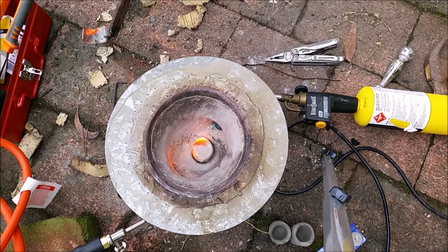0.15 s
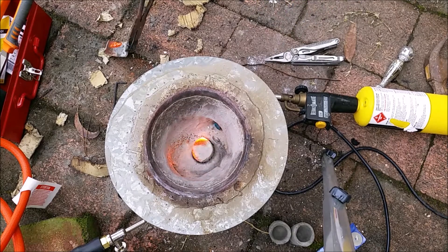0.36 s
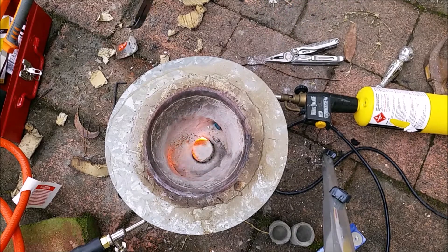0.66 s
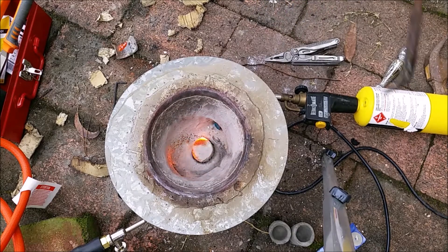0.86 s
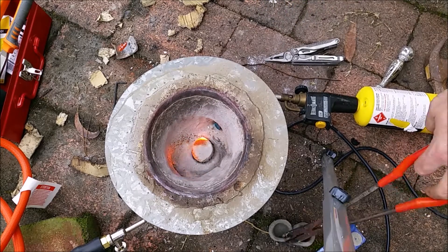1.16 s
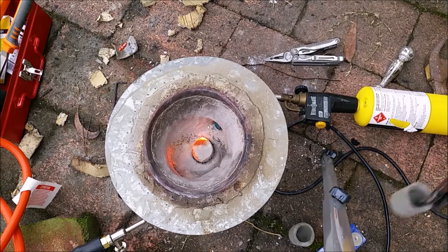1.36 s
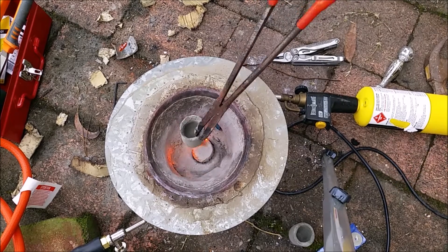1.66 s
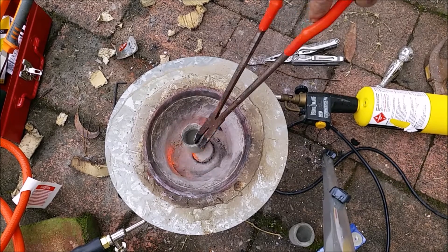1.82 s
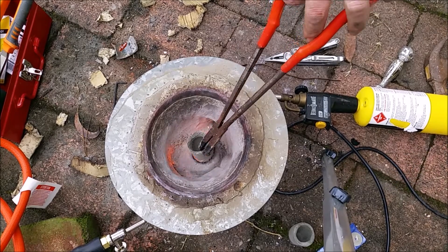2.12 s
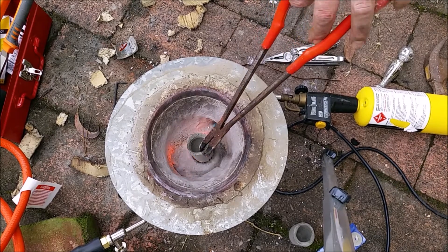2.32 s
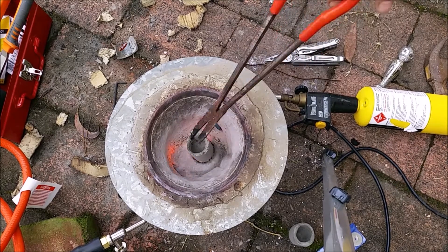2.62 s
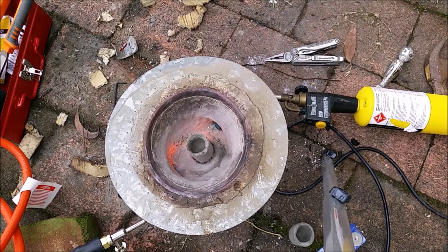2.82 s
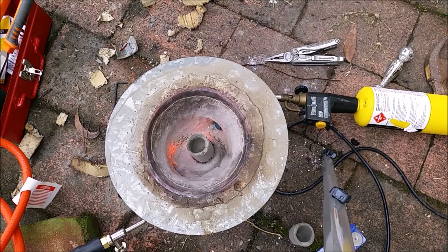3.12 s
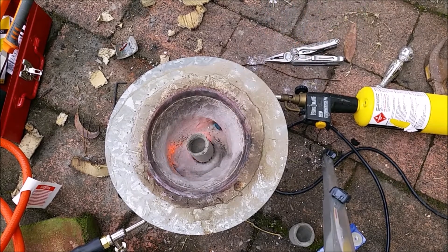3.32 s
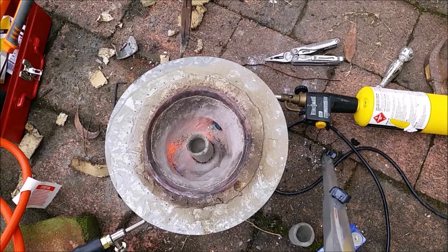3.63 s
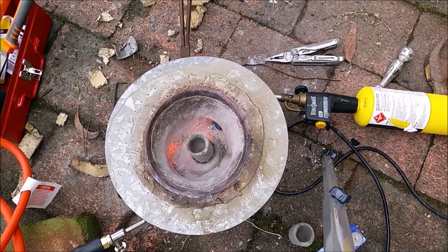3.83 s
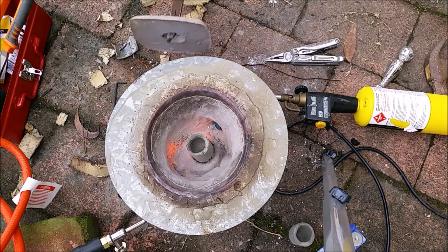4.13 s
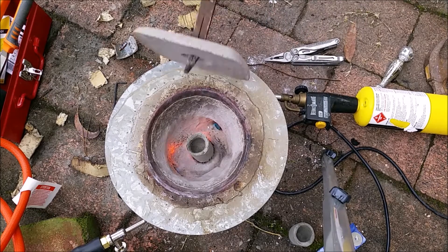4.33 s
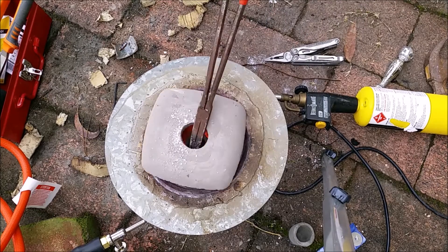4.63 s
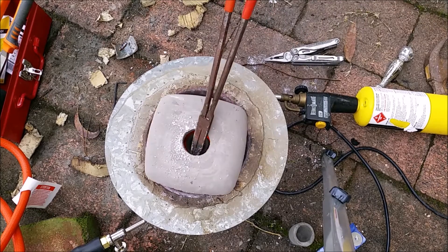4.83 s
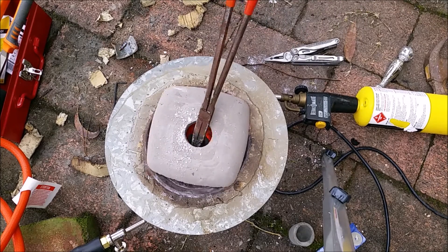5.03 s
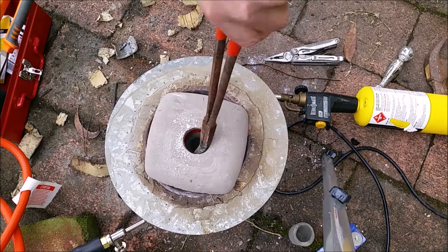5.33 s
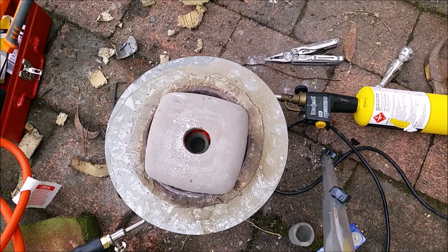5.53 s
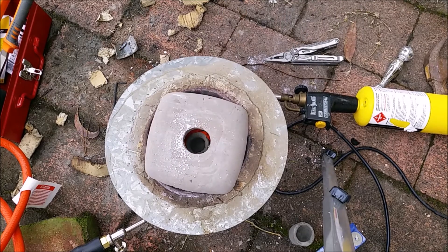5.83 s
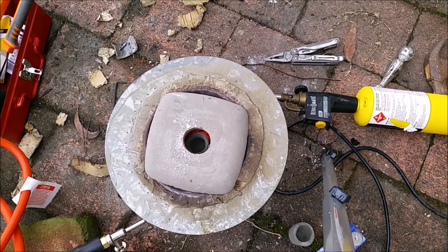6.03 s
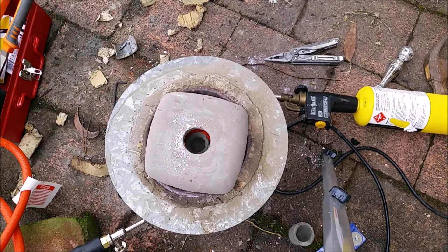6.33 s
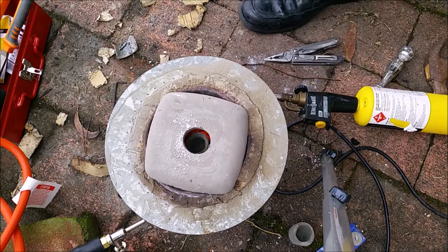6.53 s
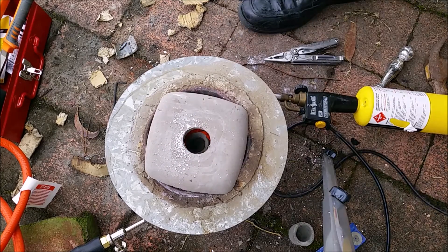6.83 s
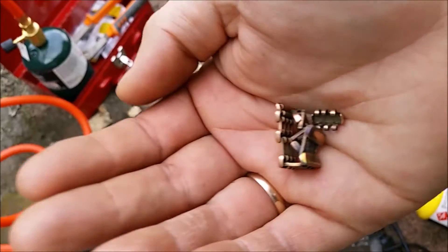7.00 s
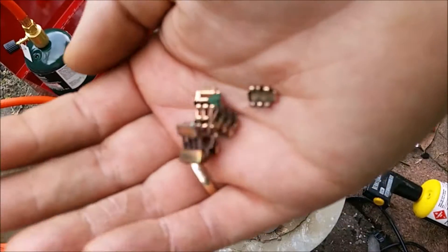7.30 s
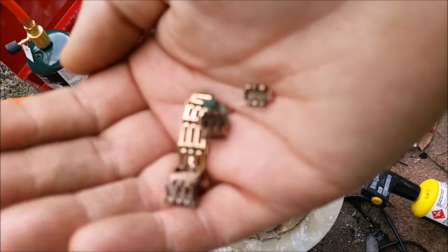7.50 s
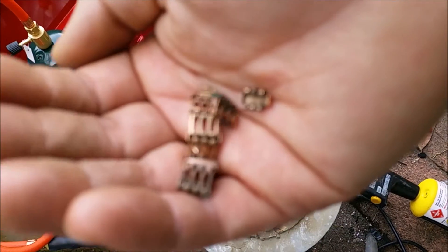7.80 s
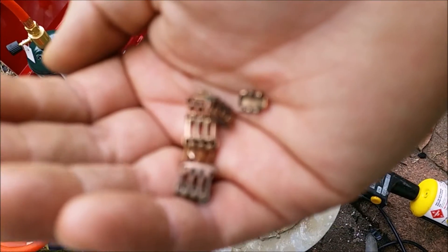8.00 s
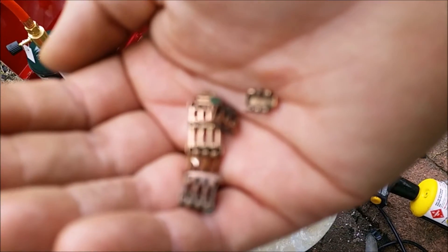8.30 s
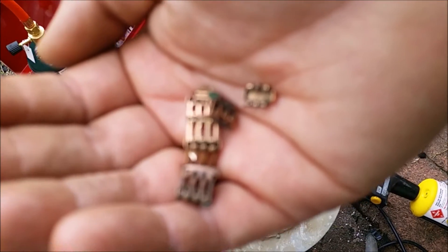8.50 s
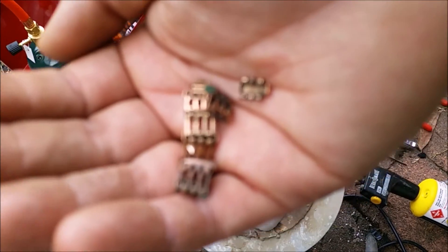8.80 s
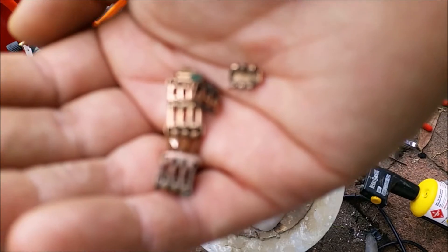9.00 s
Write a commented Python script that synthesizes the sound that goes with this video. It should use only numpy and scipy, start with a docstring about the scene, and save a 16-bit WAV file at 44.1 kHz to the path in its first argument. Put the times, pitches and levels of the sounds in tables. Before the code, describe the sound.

Close stereo microphone above a small outdoor furnace: flickering bright jet hiss over a low flame roar and soft wind buffeting. The roar swells for a moment and drops. Low, short thumps mark a lid being placed and nudged; the treble dulls and the sound gradually fades away. After a brief silence, a deep chamber boom swells in and holds steadily, with side hisses and faint left-hand whistling.

```python
"""A paved yard, heard from just above a small furnace into which a gas torch fires: hiss, roar and wind.
The open torch is turbulent noise coloured by the flame and bowl; a lid goes on and dulls the hiss.
Dull thumps, damped low resonances, fall mostly on the left. The sound is faded out to silence; then the
closed furnace is faded in from closer by: a deep roar of chamber modes, with hiss at each side and
faint whistles, narrow resonances driven by noise, mostly on the left."""
import sys
import numpy as np
from scipy import signal
from scipy.fft import rfft, irfft, next_fast_len
from scipy.io import wavfile

SR = 44100
rng = np.random.default_rng(int(sys.argv[2]) if len(sys.argv) > 2 else 0)


def store_pcm(level_fs):
    """Save levels as 16-bit WAV."""
    pcm = np.round(np.clip(level_fs, -1, 1) * 32767).astype(np.int16)
    wavfile.write(sys.argv[1], SR, np.atleast_2d(pcm).T)


N = 403515

# Every spectrum is a relative noise density: frequency_hz, density_db.
# Every list of resonances (peaks above 0 dB, dips below): centre_hz, width_hz, height_db.
# Every stereo image: frequency_hz, left_right_likeness (0-1), left_minus_right_db, left_lead_samples.

# Stereo image of the flame and its jet
JET_IMAGE = [(400, 0.96, 1, 0.085), (605, 0.92, 0.5, .5), (3000, 0.91, 2, 0.37), (5970, .8, 2.5, 0.65),
             (8975, 0.04, -2, 1), (13500, 0.3, 6.5, .8)]
# Stereo image of the bright hisses
SIZZLE_IMAGE = [(4000, 0.76, 3.4, 1), (8020, 1, 2, .9), (12000, .5, 5, 0.78), (15500, 0.37, 11, 1.2)]
# Stereo image of wind and rumble
WIND_IMAGE = [(50, 0.27, 0.23, 0.0063), (150, 0.28, 0.37, 0.0059), (400, 0.28, 2, 0)]
# Resonances and dips of the bowl in which the jet rings
JET_RINGS = [(1130, 70, -16), (1343, 380, 4), (1474, 23, -19), (1664, 110, -0.5), (2113, 56, -6),
             (2350, 80, 2.5), (2800, 150, 1), (3004, 80, -9.5), (3284, 250, -2), (3738, 110, -13),
             (3790, 130, 6), (13570, 1500, 3)]
# Slow state of the flame before flare and lid: time_s, roar_db, jet_db, gathered_band_db
FLAME = [(0, -31, -18.5, -50), (1.4, -29, -19, -42.5), (2.0, -30.5, -20, -25), (3.0, -31.5, -18.5, -29.5),
         (3.5, -33.5, -20, -24.5), (4.5, -32.5, -20, -22.5), (5.1, -33.5, -19.5, -25),
         (5.3, -36.5, -20, -25), (6.8, -34, -20.5, -28)]


def from_db(db):
    """Decibel law: amplitude gain of a level in dB."""
    return 10 ** (np.asarray(db) / 20)


def rms_one(x):
    """Normalization of mean power: scale to unit rms."""
    return x / np.sqrt(np.mean(x ** 2) + 1e-20)


def ramp(start_s, end_s):
    """Linear transition: 0 up to the start, 1 from the end on."""
    return np.clip((np.arange(N) / SR - start_s) / (end_s - start_s), 0, 1)


def bump(centre_s, width_s):
    """Gaussian swell of height 1, fallen to 1/e at width_s from its centre."""
    return np.exp(-((np.arange(N) / SR - centre_s) / width_s) ** 2)


def in_time(rows):
    """Linear interpolation in time: columns of a curve table, one value a sample."""
    time_s, *columns = np.transpose(rows)
    return [np.interp(np.arange(N) / SR, time_s, column) for column in columns]


def at_hz(rows, hz):
    """Interpolation along log frequency: columns of a frequency table."""
    table_hz, *columns = np.transpose(rows)
    return [np.interp(np.log(hz), np.log(table_hz), column) for column in columns]


def drift(rate):
    """Low-passed noise of unit rms: a slow fluctuation from two equal poles with corner at rate Hz."""
    step = 40   # samples between the computed points
    r = np.exp(-2 * np.pi * rate * step / SR)
    white = rng.standard_normal(N // step + 2002)
    slow = signal.lfilter([1], [1, -2 * r, r * r], white)[2000:]   # without the settling of the filter
    return np.interp(np.arange(N) / step, np.arange(len(slow)), rms_one(slow))


def turbulence(spectrum, rings, image, shared_db, own_db, rate, count=1):
    """Coloured stereo noise of mid rms 1, its count bands an octave flickering together and alone."""
    size = next_fast_len(N)
    hz = np.maximum(np.arange(size // 2 + 1) * SR / size, 1)
    lowest_hz, highest_hz = spectrum[0][0], spectrum[-1][0]

    colour_db, = at_hz(spectrum, hz)
    for centre_hz, width_hz, height_db in rings:
        colour_db = colour_db + height_db / (1 + (2 * (hz - centre_hz) / width_hz) ** 2)
    colour = from_db(colour_db) * (hz > lowest_hz) * (hz < highest_hz)

    # A common and an opposed noise together set the likeness of the sides
    alike, balance_db, lead = at_hz(image, hz)
    alike = np.clip(alike, 0, 1)
    common, apart = rfft(rng.standard_normal((2, size)))
    sides = np.array([[1], [-1]])
    pair = np.sqrt(1 + alike) * common + sides * np.sqrt(1 - alike) * apart
    lead_phase = np.exp(1j * np.pi * sides * lead * hz / SR)
    pair = pair * colour * from_db(sides * balance_db / 2) * lead_phase

    band_position = count * np.log2(hz)
    first, last = int(count * np.log2(lowest_hz)), int(count * np.log2(highest_hz)) + 1
    together = drift(rate)
    out = 0
    for k in range(first, last + 1):
        slope = np.clip(1 - abs(band_position - k), 0, 1)   # overlapping slopes add up to one
        band = irfft(pair * slope, size)[:, :N]
        out = out + band * from_db(shared_db * together + own_db * drift(rate))
    return out / np.sqrt(np.mean(out.mean(axis=0) ** 2))


def far_rumble():
    """Low-frequency broadband noise: a faint, steady far rumble."""
    rumble_spectrum = [(15, -1.5), (40, -4), (100, 4.5), (200, -3.5)]
    return from_db(-67.5) * turbulence(rumble_spectrum, [], WIND_IMAGE, shared_db=-1.5, own_db=3.5, rate=6.7)


def wind():
    """Turbulent pressure fluctuation: low noise, nearly unlike at the two sides, swelling in gusts."""
    wind_spectrum = [(20, -28), (50, -38), (100, -12.5), (200, -4), (350, -3), (500, -4.5), (800, -35)]
    # Gusts over the breeze: centre_s, level_db, width_s
    gust_rows = [(.09, -48, 0.23), (.55, -52.5, 0.17), (.9, -46.5, 0.044), (1.17, -42.5, .08),
                 (1.32, -38, 0.047), (1.426, -36.5, 0.095), (2.15, -49.5, 0.24), (2.453, -39.5, 0.19),
                 (2.884, -40, .06), (3.03, -42, .1), (3.15, -40, 0.1), (3.41, -42, 0.043),
                 (3.848, -48, .08), (4.093, -48, .1), (4.218, -41, 0.03), (4.964, -51, .06),
                 (6.602, -38, .03)]
    strength = from_db(-55)   # the steady breeze
    for centre_s, level_db, width_s in gust_rows:
        strength = strength + from_db(level_db) * bump(centre_s, width_s)
    return strength * turbulence(wind_spectrum, [], WIND_IMAGE, shared_db=1.2, own_db=4.0, rate=9.3)


def thumps():
    """Damped oscillation: a soft push rings one low resonance under a rough puff, mostly on the left."""
    # Thumps, level before onset, decay and the gains of the sides: start_s, level_db, pitch_hz
    thump_rows = [(4.209, -44, 479), (4.428, -23.5, 402), (4.449, -28, 416), (4.751, -30, 460),
                  (5.009, -31, 460), (5.157, -34, 380), (5.201, -24, 388), (5.74, -31, 400),
                  (5.765, -30.5, 420), (5.789, -35, 380), (6.688, -42.5, 335)]
    decay_60db_s, onset_s = 0.081, 0.0032
    out = np.zeros(N)
    age = np.arange(SR // 4) / SR
    rough_band = signal.butter(2, [300, 900], "band", fs=SR, output="sos")
    for start_s, level_db, pitch_hz in thump_rows:
        puff = rng.standard_normal(len(age))
        puff = signal.sosfilt(rough_band, puff)
        puff = rms_one(puff)
        envelope = from_db(level_db - 60 * age / decay_60db_s) * (1 - np.exp(-age / onset_s))
        start = round(start_s * SR)
        out[start:start + len(age)] += envelope * (np.sin(2 * np.pi * pitch_hz * age) + 0.66 * puff)
    return out * from_db([[9], [-3]])   # left, right


def whistles():
    """Resonance driven by noise: narrow tones swell each on its own, faint on the right, and surge once."""
    # Whistles, rms level before swelling and the gains of the sides: centre_hz, width_hz, level_db
    whistle_rows = [(3337, 25, -45), (3530, 110, -44), (4620, 110, -50.5), (5740, 29, -49), (5700, 36, -64),
                    (6360, 48, -51), (7330, 180, -49)]
    out = 0
    for centre_hz, width_hz, level_db in whistle_rows:
        r = np.exp(-np.pi * width_hz / SR)
        poles = [1, -2 * r * np.cos(2 * np.pi * centre_hz / SR), r * r]
        tone = signal.lfilter([1, 0, -1], poles, rng.standard_normal(N))
        out = out + from_db(level_db + 1.1 * drift(9.1)) * rms_one(tone)
    surge_db = 2.5 * bump(7.92, 0.11)
    return out * from_db([[5], [-9]]) * from_db(surge_db)   # left, right


def closed_hiss():
    """Uncorrelated noise: each side hears a steady hiss of its own."""
    left_spectrum = [(1500, -17), (2700, -18), (4000, -12), (5200, -4), (7500, -9), (8600, -14.5),
                     (12000, -20), (16500, -26)]
    right_spectrum = [(1500, -5), (2700, -18), (3400, -3), (4200, -13), (8200, -13), (9200, -3),
                      (12500, -1.5), (16500, -18)]
    # Dip common to both hisses
    dip_rows = [(8900, 330, -2)]
    same = [(1000, 1, 0, 0)]   # image with no difference between the sides
    left = turbulence(left_spectrum, dip_rows, same, shared_db=-1.5, own_db=2.2, rate=19)[0]
    right = turbulence(right_spectrum, dip_rows, same, shared_db=-1.0, own_db=1.5, rate=15)[1]
    left_db, right_db = -46.5 + 8.5, -46.5 + 7
    return np.array([from_db(left_db) * left, from_db(right_db) * right])


def chamber_roar():
    """Cavity resonance: turbulent noise booms through the modes of the closed chamber."""
    deep_spectrum = [(12, -57), (20, -27.5), (160, -5), (235, -5.5), (290, -9.5), (337, -11.5),
                     (391, -17.5), (494, -5), (637, -3.5), (995, -6), (1660, -24), (2880, -32.5),
                     (3200, -31), (4160, -58), (7040, -120)]
    # Modes and dips of the chamber
    chamber_rows = [(176, 26, 2), (295, 33, -9.5), (334, 50, 3), (391, 27, -7), (673, 150, 5.5),
                    (754, 12, -10), (852, 56, 4)]
    # Stereo image of the boom
    deep_image = [(25, .4, -6, -1), (60, 0.56, -4, -3), (128, 1, -1, 25), (340, 0.88, 0.5, 17),
                  (460, 1, 5, -3), (700, 1, 1, -2.5), (1000, 0.82, 5.5, 3), (1500, 0.98, 4, -6),
                  (2500, 0.53, 2, -2.5)]
    return from_db(-18) * turbulence(deep_spectrum, chamber_rows, deep_image,
                                     shared_db=-0.8, own_db=1.53, rate=26)


def closed_furnace():
    """Superposition of the chamber's roar, the hiss at each side and the whistles."""
    return chamber_roar() + closed_hiss() + whistles()


def lid():
    """Closing aperture: 0 open to 1 shut, the gap closing slowly at first; the lid tips open once."""
    closing = ramp(4.4, 4.86) ** 2
    tip = 0.39 * bump(5.195, 0.019)
    return closing * (1 - tip)


def flare():
    """Transient of combustion: the flame flares up over a quarter second and drops back at once."""
    rise_s, end_s, fall_s = 0.25, 2.25, 0.015
    return ramp(end_s - rise_s, end_s) * (1 - ramp(end_s, end_s + fall_s))


def treble():
    """Amplitude modulation: flickering level of the top hiss in dB, without the lid."""
    # Level of the top hiss: time_s, level_db
    treble_rows = [(0, -37.5), (.09, -42.5), (.35, -31.5), (.54, -32.5), (.6, -41.5), (.71, -33),
                   (.86, -47), (1.0, -32), (1.17, -47), (1.23, -35), (1.32, -51), (1.53, -36.5),
                   (1.62, -43), (1.71, -32), (1.92, -37.5), (2.16, -29.5), (2.24, -35), (2.8, -34.5),
                   (2.93, -39.5), (3.01, -36), (3.13, -39.5), (3.34, -28.5), (3.47, -34), (3.72, -29.5),
                   (4.5, -31)]
    return in_time(treble_rows)[0]


def air(bright_db, shut):
    """Partial modulation: an airy band at the very top half follows the treble and leaks past the lid."""
    air_spectrum = [(11500, -16), (12800, -1.5), (13500, 2), (14500, -3), (15200, -11), (16000, -14.5)]
    level_db = -40.5 + 0.46 * bright_db - 5 * shut
    return from_db(level_db) * turbulence(air_spectrum, [], SIZZLE_IMAGE,
                                          shared_db=0.7, own_db=0.6, rate=10, count=3)


def top_hiss(top_db, shut):
    """High-frequency jet noise: the top hiss flickers in full and is shut in by the lid."""
    top_spectrum = [(7500, -12), (9500, 1.5), (10000, 0.5), (13000, 3), (15000, -3.5), (16500, 2.5)]
    # Dips in the top hiss
    top_rings = [(13440, 400, -2), (14300, 260, -0.5), (14800, 200, -0.5)]
    level_db = top_db - 12.5 * shut
    return from_db(level_db) * turbulence(top_spectrum, top_rings, SIZZLE_IMAGE,
                                          shared_db=0.5, own_db=1.5, rate=14, count=3)


def sizzle(bright_db, shut):
    """Noise through resonances: a bright sizzle partly follows the treble and is shut in by the lid."""
    sizzle_spectrum = [(1940, -40), (3300, -3.5), (3740, -11.5), (4440, -4), (5440, -3.5), (6410, -10.5),
                       (7720, -11), (9500, -20), (12400, -45), (20900, -120)]
    # Resonances and dips of the sizzle
    sizzle_rings = [(3710, 130, -12.5), (3970, 91, 9), (4560, 100, 3.5), (4620, 46, -7.5), (5600, 80, -0.5),
                    (5950, 80, 1.5), (6300, 150, 0.5), (7800, 100, -7), (7770, 120, 8), (8630, 150, 4.5),
                    (9120, 500, 5)]
    level_db = -24.5 + 0.44 * bright_db - 16 * shut
    return from_db(level_db) * turbulence(sizzle_spectrum, sizzle_rings, SIZZLE_IMAGE,
                                          shared_db=-0.24, own_db=1.38, rate=19, count=2)


def gathered_band(focus_db, shut):
    """Selective resonance: the jet gathers into one band of the bowl, which the lid strengthens."""
    focus_spectrum = [(2000, -13), (2400, -7), (2700, 0.5), (3300, 2), (3600, -6), (3900, -20)]
    level_db = focus_db + 3 * shut
    return from_db(level_db) * turbulence(focus_spectrum, JET_RINGS, JET_IMAGE,
                                          shared_db=1.35, own_db=-1.95, rate=15)


def jet(jet_db, bright_db, flaring, shut):
    """Jet mixing noise ringing in the bowl: yields slightly as the treble rises, and to the lid."""
    jet_spectrum = [(590, -52.5), (1000, -23), (1140, -12), (1330, -10.5), (1640, -14.5), (1930, -4),
                    (2850, -3.5), (3310, -3.5), (3760, -5.5), (6540, -23.5), (11400, -38.5), (13400, -35.5),
                    (15700, -34)]
    level_db = jet_db - 0.05 * bright_db + 2 * flaring - 4 * shut
    return from_db(level_db) * turbulence(jet_spectrum, JET_RINGS, JET_IMAGE,
                                          shared_db=0.45, own_db=0.72, rate=17)


def flame_roar(roar_db, flaring, shut):
    """Combustion noise: the low roar of the flame swells with the flare and barely heeds the lid."""
    roar_spectrum = [(150, -31), (250, -12.5), (400, -9), (550, -1), (900, -2.5), (1050, -10), (1200, -37)]
    level_db = roar_db + 7.5 * flaring - 0.5 * shut
    return from_db(level_db) * turbulence(roar_spectrum, [], JET_IMAGE, shared_db=0.4, own_db=1.4, rate=31)


def torch():
    """Superposition of roar, jet and hisses, coupled by one flame, one flare, one treble and one lid."""
    roar_db, jet_db, focus_db = in_time(FLAME)
    top_db, shut, flaring = treble(), lid(), flare()
    bright_db = top_db + 35   # above the usual treble of -35 dB
    low = flame_roar(roar_db, flaring, shut) + jet(jet_db, bright_db, flaring, shut)
    high = sizzle(bright_db, shut) + top_hiss(top_db, shut) + air(bright_db, shut)
    return low + gathered_band(focus_db, shut) + high


def scene():
    """Superposition under a fader: open torch in its yard, then closed furnace; thumps bypass the fader."""
    t = np.arange(N) / SR
    fade_out = (1 - ramp(5.3, 6.91)) * (t < 6.875)   # the last whisper is cut
    fade_in = ramp(7.262, 7.7) ** 0.92
    open_view = far_rumble() + wind() + torch()
    view = np.where(t < 7.05, open_view, closed_furnace())
    return (fade_out + fade_in) * view + thumps()


def record(dry):
    """Soft saturation rounds the peaks; a steep elliptic low-pass cuts the top."""
    rounded = 1.08 * np.tanh(dry / 1.116)
    low_pass = signal.ellip(12, 0.3, 65, 15740, fs=SR, output="sos")   # ripple dB, stop dB, cutoff Hz
    return signal.sosfilt(low_pass, rounded)


dry = scene()
out = record(dry)
store_pcm(out)
```